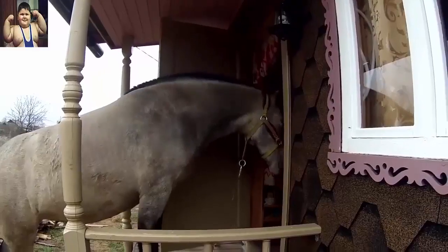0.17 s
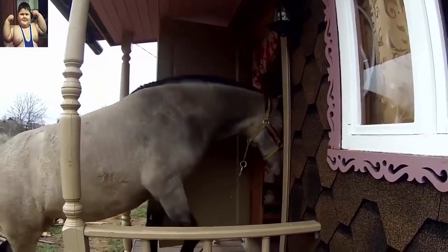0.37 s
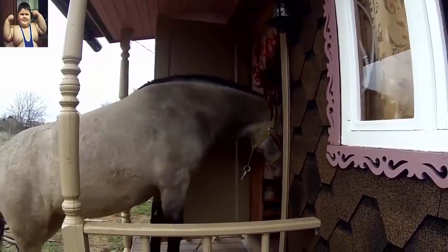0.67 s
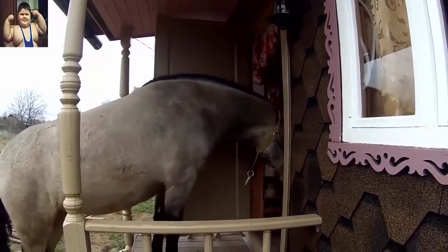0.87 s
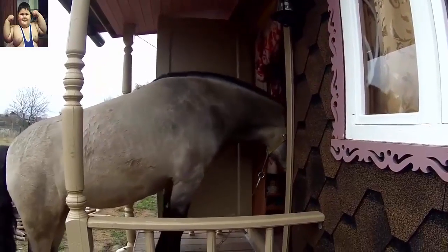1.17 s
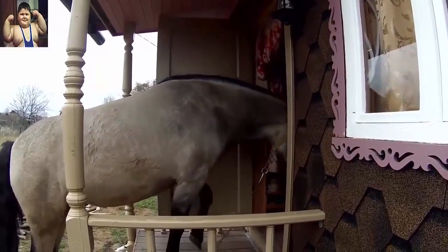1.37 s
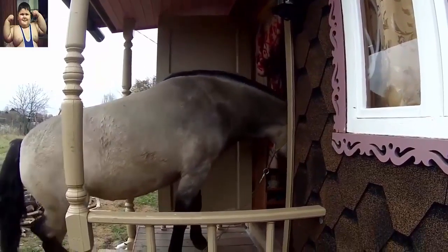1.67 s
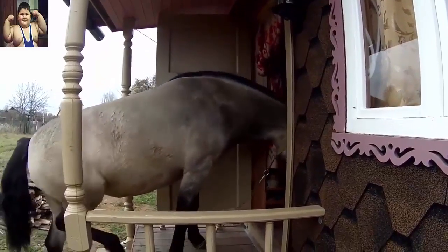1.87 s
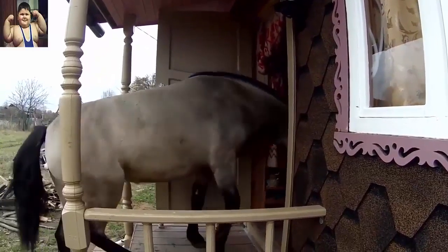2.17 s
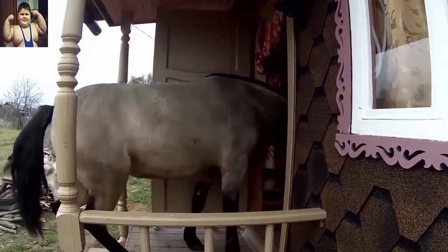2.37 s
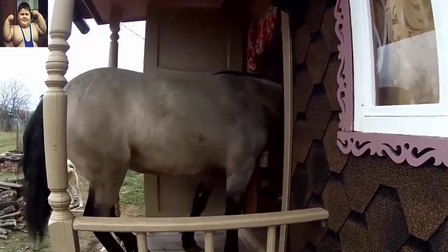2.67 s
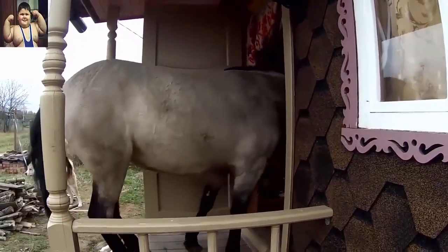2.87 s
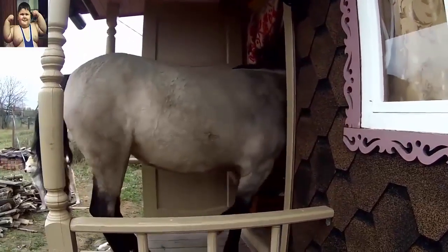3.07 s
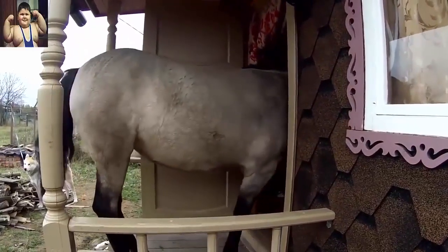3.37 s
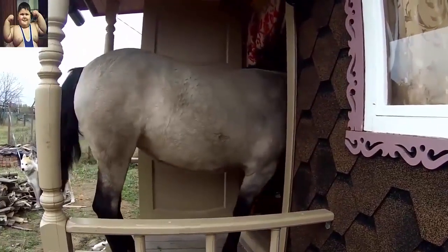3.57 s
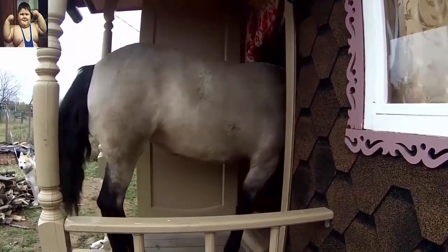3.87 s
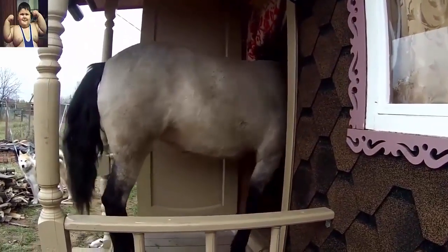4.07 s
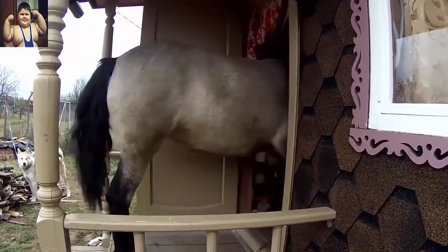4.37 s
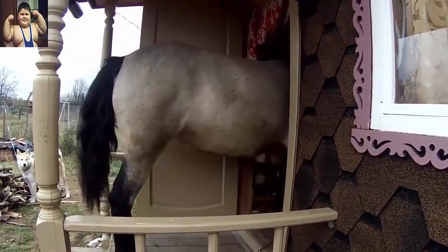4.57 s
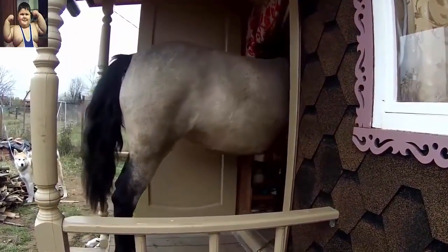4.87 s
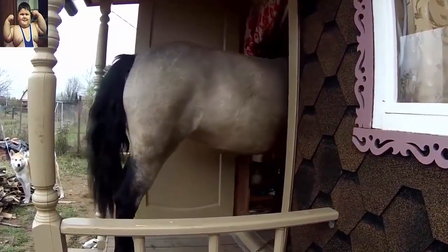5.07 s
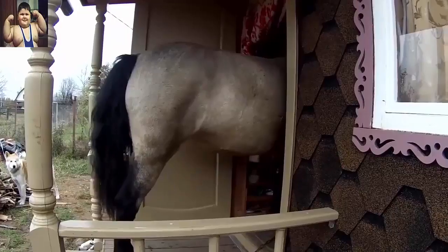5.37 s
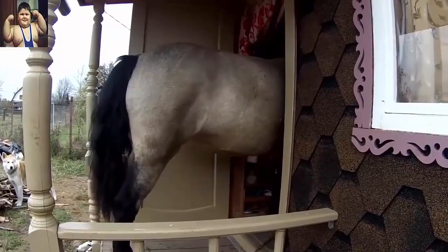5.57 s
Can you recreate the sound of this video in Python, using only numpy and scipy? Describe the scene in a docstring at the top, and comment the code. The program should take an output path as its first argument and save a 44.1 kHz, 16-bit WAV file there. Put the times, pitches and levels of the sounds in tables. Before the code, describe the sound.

Quiet outdoor air and a faint low rumble of joists run throughout. In the first 0.6 s a hoof shifts softly, rubbing boards and grit, with a tiny bright buckle clink near 0.5 s. A deep, booming hoof blow lands at 0.7 s, with a hollow clop at 0.9 s, then light scuffs and a duller thud around 1.65 s. At 1.8-1.9 s a rapid stumble clatters in hard woody knocks with crunching grit and a dry snap. Thuds follow at about 2.2, 2.5 and 2.8 s; a hoof drags with a rough woody scrape and faint clinks around 2.8-3.1 s. Further blows fall at 3.2 and 3.6 s, the latter deep. Soft scuffs and small ticks fill the quieter stretch until a loud, hard, resonant knock at 4.9 s, which decays into low rumble and air. Everything is close, with short porch reverberation and slightly thin deep bass.

```python
"""Quiet outdoor air (coloured noise) and a low joist rumble lie under the whole scene.
A horse first shifts its hooves on a wooden porch, rubbing boards and grit by stick and slip; a buckle clinks.
Then hoof blows excite damped modes of deck and boards and crush grit; small dry snaps fall among them.
A quick run of blows is a stumble, a later hoof drags, and more blows follow over the door threshold
to the end. The porch adds a brief reverberation to each sound of the horse."""
import sys
import numpy as np
from scipy import signal
from scipy.fft import rfft, irfft
from scipy.io import wavfile

SR = 44100
rng = np.random.default_rng(int(sys.argv[2]) if len(sys.argv) > 2 else 0)


def persist_wave(psi):
    """Save psi, clipped to +-1, as 16-bit WAV."""
    counts = np.round(np.clip(psi, -1, 1) * 32767).astype(np.int16)
    wavfile.write(sys.argv[1], SR, np.atleast_2d(counts).T)


N = 252384  # samples in the scene


def amp(db):
    """Decibel law: level to amplitude ratio."""
    return 10 ** (np.asarray(db) / 20)


def evened(x):
    """Normalisation to unit root-mean-square level."""
    return x / np.sqrt(np.mean(x ** 2) + 1e-20)


def read(points, hz):
    """Interpolation of a curve along a logarithmic frequency axis."""
    f, value = np.transpose(points)
    return np.interp(np.log(hz + 1), np.log(f + 1), value)


def add(mix, s, sound):
    """Superposition: adds a sound to the mix from time s."""
    part = mix[max(round(s * SR), 0):][:len(sound)]
    part += sound[:len(part)]


def coloured(x, points):
    """Linear filtering: weights the spectrum of x by a curve, then sets unit level."""
    hz = np.fft.rfftfreq(len(x), 1 / SR)
    return evened(irfft(rfft(x) * amp(read(points, hz)), len(x)))


def swing(t, hz, rise_s, t60):
    """Damped harmonic oscillation: one mode, pushed into motion over a short time."""
    return amp(-60 * t / t60) * np.sin(2 * np.pi * hz * t) * (1 - np.exp(-t / rise_s))


def grains(per_s, spread_db):
    """Random impulse process: a dense train of tiny fractures of uneven size."""
    size = amp(spread_db * np.minimum(rng.exponential(1, N), 4))
    happens = rng.random(N) < per_s / SR
    return evened(size * rng.standard_normal(N) * happens)


# spectrum of outdoor air: (frequency [Hz], relative density [dB per Hz])
AIR_SPECTRUM = [(20, -7.5), (45, -2.5), (73, -3), (100, -22), (180, -16), (300, -17), (700, -18.5),
                (1200, -23.5), (2500, -26), (5000, -31.5), (10000, -38), (14000, -41.5)]
AIR_DB = -66.5


def air():
    """Stationary broadband noise: the faint steady wash of the yard."""
    return amp(AIR_DB) * coloured(rng.standard_normal(N), AIR_SPECTRUM)


# a hoof slides and takes weight: (time of greatest pressure [s], swell [s], fade [s],
# board rub level [dB], grit level [dB], deck rumble level [dB])
SLIDES = [(0.125, 0.049, .12, -60.5, -72, -79), (0.445, 0.037, 0.065, -57.5, -74, -52.5),
          (0.485, 0.049, 0.028, -64.5, -57.5, -67), (0.525, 0.015, 0.027, -63.5, -72, -57),
          (1.015, 0.042, 0.042, -48, -67.5, -68), (1.42, 0.39, 0.25, -75, -81, -55.5),
          (1.834, 0.036, .11, -37, -54, -46), (2.1, 0.2, 0.35, -61, -75, -51.5),
          (2.36, 0.082, 0.25, -56, -69.5, -55), (2.54, 0.12, 0.19, -65, -71.5, -57),
          (2.8, 0.2, 0.48, -47, -60, -48), (2.885, 0.038, 0.039, -39, -56.5, -31.5),
          (3.029, 0.082, 0.037, -40, -56.5, -42.5), (3.12, 0.1, 0.15, -49, -61, -47),
          (3.28, 0.14, 0.25, -62.5, -75.5, -44.5), (3.608, 0.084, 0.21, -53.5, -71, -42.5),
          (3.85, 0.062, 0.03, -54, -70, -63), (3.96, 0.13, 0.12, -58, -76, -63),
          (4.029, 0.031, 0.038, -55, -72, -59), (4.3, 0.13, 0.12, -61, -67.5, -66),
          (4.93, 0.028, 0.19, -52.5, -73, -53)]
SLIDE_EDGE_DB = -20  # level one swell before or one fade after the peak, relative to it


def slide_power(levels_db):
    """Energy addition: power of all slides at the given peak levels, each a smooth swell and fade."""
    t, power = np.arange(N) / SR, np.zeros(N)
    for (s, swell_s, fade_s, *_), db in zip(SLIDES, levels_db):
        away = (t - s) / np.where(t < s, swell_s, fade_s)
        near = abs(away) < 2
        power[near] += amp(db + SLIDE_EDGE_DB * away[near] ** 2) ** 2
    return power


# shudder level relative to the thump [dB], shudder decay [s], rumble level at rest [dB]
SHUDDER_DB, SHUDDER_T60, REST_DB = -25, 0.72, -70.5


def deck():
    """Forced low-frequency vibration: joists rumble under shifting weight and shudder after each blow."""
    # (frequency [Hz], relative density [dB per Hz])
    colour = [(20, -17.0), (45, 3), (72, 4.5), (105, 1.5), (135, -7.5), (185, -8.5),
              (260, -14.5), (400, -19.5), (900, -48.0), (2000, -80)]
    t = np.arange(SR) / SR
    power = amp(REST_DB) ** 2 + slide_power([db for *_, db in SLIDES])
    for s, thump_db, *_ in KNOCKS:
        add(power, s, amp(thump_db + SHUDDER_DB - 60 * t / SHUDDER_T60) ** 2)
    return np.sqrt(power) * coloured(rng.standard_normal(N), colour)


def judder(depth_db=2.5, count=380):
    """Friction fluctuation: uneven pressure of a sliding hoof, as a gain for every sample."""
    gain_db = depth_db * np.clip(rng.standard_normal(count), -2, 2)
    return amp(np.interp(np.arange(N), np.linspace(0, N, count), gain_db))


# modes of the porch boards, also rung by the blows: (frequency [Hz], level in a blow [dB], t60 [s])
BOARDS = [(101, 3.5, 0.17), (131.5, 0.5, 0.13), (144, 0.5, 0.07), (162.2, 0.5, 0.21), (186.5, -13, 0.51),
          (215.5, 4, 0.096), (239, 0, 0.16), (251.2, -6.5, 0.23), (297.6, -2.5, 0.23), (336.8, -1.5, 0.16),
          (380.6, -6, 0.2), (462.2, 1.5, 0.12), (496.7, -3, 0.098), (533.8, -1, 0.17), (583.5, 5.5, 0.041),
          (596.3, -2.5, 0.12), (641, -0.5, 0.13), (671.7, -9, 0.15), (719.4, -1.5, 0.15), (745, -7, 0.15),
          (787, 4.5, 0.081), (839.6, -8.5, 0.17), (888, 1, 0.084), (959.6, -11, 0.1146), (1049, -11.5, 0.1)]
# spectrum of the rubbed boards: (frequency [Hz], relative density [dB per Hz])
RUB_SPECTRUM = [(120, -19.5), (250, -5), (380, -5), (480, -2.5), (620, -2.5), (800, -3), (950, -10.5),
                (1200, -10.5), (1600, -31), (3000, -40)]


def drag(ring_share=0.84, wander_db=6.0, count=120):
    """Stick-slip excitation: slips of a hoof ring board modes whose coupling wanders as it travels."""
    slips, t = grains(per_s=1500, spread_db=1.0), np.arange(SR // 4) / SR
    ringing, knots = np.zeros(N), np.linspace(0, N / SR, count)
    for hz, _, t60 in BOARDS:
        knot_gain = amp(wander_db * rng.standard_normal(len(knots)))
        coupling = np.interp(np.arange(N) / SR, knots, knot_gain)
        mode = amp(-60 * t / t60) * np.sin(2 * np.pi * hz * t)
        ringing += signal.oaconvolve(slips * coupling, mode)[:N]
    rung = ring_share * coloured(ringing, RUB_SPECTRUM)
    rub = rung + (1 - ring_share) * coloured(slips, RUB_SPECTRUM)
    return np.sqrt(slide_power([db for *_, db, _, _ in SLIDES])) * evened(rub)


# spectrum of crushed grit: (frequency [Hz], relative density [dB per Hz])
GRIT_SPECTRUM = [(600, -29), (1000, 3), (1300, -1), (1700, 0), (2400, -2), (3200, -9.5), (4300, -9.5),
                 (5200, -15.5), (8000, -19.5), (13500, -30)]
# narrow ringing tones that colour the crushed grit: (frequency [Hz], level [dB], t60 [s])
CRUNCH_TONES = [(1094, 8, 0.02), (1200, 1.5, 0.034), (1554, 0, 0.014), (1838, 1, .035),
                (2050, -1.5, 0.0398), (2467, -11.5, 0.031), (2625, -0.5, .04), (3030, 0.5, 0.032),
                (3320, -2, .04), (3950, -13.5, 0.018)]
# under blows, treble changes by TREBLE_GROWTH dB per dB of grit level, equal at PIVOT_DB:
# loud crushes are duller, quiet ones brighter
PIVOT_DB, TREBLE_GROWTH = -58, 0.51


def grit(pressure, crush_t60=0.099, rise_s=0.0019, crush_db=3, tone_share=.36,
         dull_hz=2400, sharp_hz=5000):
    """Brittle fracture: sand cracks along slides and under blows, with a slightly pitched crunch."""
    t, power, treble_power = np.arange(SR // 2) / SR, np.zeros(N), np.zeros(N)
    crush = amp(crush_db - 60 * t / crush_t60) * (1 - np.exp(-t / rise_s))
    for s, *_, grit_db in KNOCKS:
        treble_db = PIVOT_DB + TREBLE_GROWTH * (grit_db - PIVOT_DB)
        add(power, s, (amp(grit_db) * crush) ** 2)
        add(treble_power, s, (amp(treble_db) * crush) ** 2)
    sliding = pressure ** 2 * slide_power([db for *_, db, _ in SLIDES])
    cracks = grains(per_s=4000, spread_db=1.0)
    tones = sum(amp(db - 60 * t / t60) * np.cos(2 * np.pi * hz * t) for hz, db, t60 in CRUNCH_TONES)
    pitched = coloured(signal.oaconvolve(cracks, tones)[:N], GRIT_SPECTRUM)
    crunch = evened((1 - tone_share) * coloured(cracks, GRIT_SPECTRUM) + tone_share * pitched)
    # split into two bands that follow their own levels
    treble_share = np.interp(np.fft.rfftfreq(N, 1 / SR), [dull_hz, sharp_hz], [0, 1])
    treble = irfft(rfft(crunch) * treble_share, N)
    return np.sqrt(power + sliding) * (crunch - treble) + np.sqrt(treble_power + sliding) * treble


# clinks of a halter buckle: (time [s], level [dB])
CLINKS = [(0.484, -53), (0.524, -64), (2.873, -61), (2.885, -68), (2.905, -68)]
# modes of the buckle: (frequency [Hz], level relative to the clink [dB], t60 [s])
BUCKLE = [(7650, -0.5, 0.033), (8100, -1, 0.027), (9200, -6, 0.023), (10400, -12.5, .02), (11600, -14, .02),
          (12700, -11.5, 0.02), (13300, -13.5, .02)]


def halter():
    """Modal synthesis: a small metal buckle rings, each mode slightly detuned at every clink."""
    t, out = np.arange(SR // 8) / SR, np.zeros(N)
    for s, level_db in CLINKS:
        for hz, db, t60 in BUCKLE:
            detuned_hz = hz * (1 + 0.014 * rng.standard_normal())
            add(out, s, amp(level_db + db - 60 * t / t60) * np.sin(2 * np.pi * detuned_hz * t))
    return out


# sharp snaps of grit and tack: (time [s], level [dB], centre frequency [Hz], width [octaves], t60 [s])
TICKS = [(0.515, -51.5, 2940, 0.51, 0.03), (0.631, -52, 1270, .6, 0.04), (1.04, -54.5, 3420, 0.91, 0.048),
         (1.803, -39.5, 2920, 0.62, 0.048), (1.818, -52.5, 7260, 0.54, 0.04),
         (1.878, -48, 3180, 0.6, 0.038), (2.135, -54, 650, 0.67, 0.044), (2.718, -47.5, 790, 0.97, 0.069),
         (2.488, -64.5, 6000, 1.3, 0.058), (2.887, -60.5, 9800, 2.1, 0.12),
         (3.015, -46.5, 1680, 1.9, 0.042), (3.18, -42, 680, 0.68, 0.054), (3.942, -53.5, 690, 0.64, 0.079),
         (4.298, -58.5, 2900, 0.89, 0.081), (4.877, -42, 1750, 0.63, 0.14)]


def ticks():
    """Band-limited transients: small dry snaps, each a decaying noise burst around its own pitch."""
    t, out = np.arange(SR // 4) / SR, np.zeros(N)
    hz = np.fft.rfftfreq(len(t), 1 / SR) + 1
    for s, db, centre_hz, octaves, t60 in TICKS:
        band = 1 / (1 + (np.log2(hz / centre_hz) / octaves) ** 2) ** 2
        burst = evened(irfft(rfft(rng.standard_normal(len(t))) * band, len(t)))
        add(out, s, burst * amp(db - 60 * t / t60))
    return out


# hoof blows: (time [s], deck thump level [dB], thump frequency [Hz], low board ring level [dB],
# high board ring level [dB], place along the board [0-1], hollow clop level [dB], clop frequency [Hz],
# grit level before the crush gain [dB])
KNOCKS = [(0.6895, -15, 60.3, -31, -42.5, 0.32, -11.5, 162.5, -60.5),
          (0.694, -14.5, 100.5, -46, -42, 0.5, -33.5, 638, -64.5),
          (0.777, -23.5, 58, -47, -53.5, 0.85, -25.5, 200, -62.5),
          (0.922, -36, 109, -28.5, -36, 0.63, -13.5, 336.6, -54.5),
          (1.007, -38.5, 60.8, -45.5, -50, 0.58, -38, 635, -84),
          (1.395, -41.5, 97.4, -65, -67, 0.8, -42.5, 170, -68),
          (1.635, -21, 58.2, -37.5, -53.5, 0.27, -40, 214, -62),
          (1.679, -27, 56, -44.5, -47, 0.41, -40.5, 417, -62.5),
          (1.795, -23, 42.3, -30.5, -25, 0.57, -13.5, 237, -47.5),
          (1.802, -22, 146.5, -35, -32.5, 0.94, -18, 747, -39),
          (1.819, -42, 136, -32, -32, 0.58, -23, 707, -36.5),
          (1.838, -36, 118, -43, -43, 0.51, -17, 738, -41.5),
          (1.861, -20.5, 109.7, -27, -33, 0.6, -26, 710, -49),
          (1.879, -34, 124, -61, -39, 0.28, -18, 748, -46),
          (1.896, -21.5, 126.5, -32.5, -37.5, 0.4, -20.5, 727, -48),
          (2.164, -21, 40.2, -27, -29.5, 0.51, -12, 173, -46),
          (2.174, -32, 90.5, -30, -39, 0.57, -22.5, 670, -51),
          (2.352, -70, 68, -58, -48, 0.72, -34, 580, -69),
          (2.397, -49, 111, -38.5, -41, 0.34, -23, 528, -58.5),
          (2.4637, -20, 62, -45, -36.5, 0.03, -31, 630, -51.5),
          (2.522, -20, 63.2, -40, -41, 0.34, -40, 558, -68.5),
          (2.813, -21, 69.6, -30.5, -33.5, 0.74, -24, 790, -51),
          (2.822, -20, 98, -31.5, -60, 0.25, -31, 468, -60),
          (3.011, -55, 63.5, -58, -33, 0.56, -25.5, 670, -40),
          (3.213, -33, 52, -33.5, -45, 0.14, -16, 143, -61),
          (3.235, -29.5, 134, -38.5, -43.5, 0.31, -21.5, 252, -57),
          (3.574, -16, 89.2, -54, -36.5, 0.21, -15.5, 169, -46.5),
          (3.5842, -21.5, 89.4, -33, -31.5, 0.22, -25, 720, -65),
          (4.588, -63.5, 52, -63, -58, 0.13, -49, 470, -94),
          (4.676, -57.5, 66.4, -68, -61, 0.45, -54, 704, -77),
          (4.8777, -20.5, 181.4, -24.5, -29, 0.14, -10, 670, -42.5),
          (4.884, -11, 89.7, -47, -22.5, 0.28, -22, 728, -42.5)]
# more grit goes with a shorter contact: upper limit of the driven board modes at PIVOT_DB [Hz],
# and the extra grit level that doubles it [dB]
HARD_HZ, OCTAVE_STEP_DB = 795, 41


def hooves(thump_t60=0.18, sink_s=0.0052, contact_s=0.00092, low_hz=220, high_hz=520,
           clop_t60=0.056, clop_rise_s=0.0039, bending_hz=20,
           sway_db=-24, sway_hz=41, sway_t60=0.62):
    """Impact excitation: a blow bounces the deck, knocks the plank and rings modes by place of contact."""
    t, out = np.arange(SR // 2) / SR, np.zeros(N)
    hz, db, t60 = np.transpose(BOARDS)
    lag = np.sqrt(hz / bending_hz)  # phase lag [rad]: bending waves carry treble faster than bass
    decays = amp(db[:, None] - 60 * t / t60[:, None])
    rings = decays * np.sin(2 * np.pi * hz[:, None] * t - lag[:, None])
    rings = rings * (1 - np.exp(-t / contact_s))
    for s, thump_db, thump_hz, low_db, high_db, place, clop_db, clop_hz, grit_db in KNOCKS:
        hard_hz = HARD_HZ * 2 ** ((grit_db - PIVOT_DB) / OCTAVE_STEP_DB)
        blow = amp(np.interp(hz, [low_hz, high_hz], [low_db, high_db]))
        soft = np.sqrt(1 + (hz / hard_hz) ** 8)  # a long contact drives high modes weakly
        shape = np.cos(np.pi * np.arange(len(hz)) * place)  # mode shapes at the hoof
        sway = amp(sway_db) * swing(t, sway_hz, sink_s, sway_t60)  # the whole deck rocks on its joists
        thump = amp(thump_db) * (swing(t, thump_hz, sink_s, thump_t60) + sway)
        clop = amp(clop_db) * swing(t, clop_hz, clop_rise_s, clop_t60)
        add(out, s, (blow * shape / soft) @ rings + thump + clop)
    return out


# reverberation of porch and hallway: (frequency [Hz], t60 [s])
PORCH_DECAY = [(80, 0.44), (250, 0.4), (700, 0.21), (2000, 0.21), (8000, 0.22)]


def porch(x, wet_db=-13.0, build_s=0.016):
    """Diffuse reverberation: scattered echoes of roof, wall and hallway, the bass lasting longest."""
    # (frequency [Hz], level [dB])
    colour = [(40, -15.0), (100, -19.5), (180, -3), (700, -6.5), (2000, -1.0), (10000, 0)]
    hz, t, z = signal.stft(rng.standard_normal(SR), SR, nperseg=256)
    level_db = -60 * t / read(PORCH_DECAY, hz)[:, None] + read(colour, hz)[:, None]
    tail = signal.istft(z * amp(level_db), SR, nperseg=256)[1]
    tail = tail * (1 - np.exp(-(np.arange(len(tail)) / SR / build_s) ** 2))  # echoes build up
    return amp(wet_db) * signal.fftconvolve(x, tail / np.linalg.norm(tail))[:N]


def scene():
    """Superposition: the horse and its reverberation over the deck rumble and air."""
    pressure = judder()
    horse = hooves() + grit(pressure) + pressure * drag() + ticks() + halter()
    return (horse + porch(horse) + deck() + air())[None]


def record(dry, low_cut_hz=30, edge_hz=14300):
    """Band limitation: a small microphone loses the deepest bass, and a low-pass ends the treble."""
    thin = signal.sosfilt(signal.butter(2, low_cut_hz, "highpass", fs=SR, output="sos"), dry)
    low_pass = signal.firwin(255, edge_hz, window=("kaiser", 9), fs=SR)
    return signal.oaconvolve(thin, low_pass[None], "same")


dry = scene()
out = record(dry)
persist_wave(out)
```